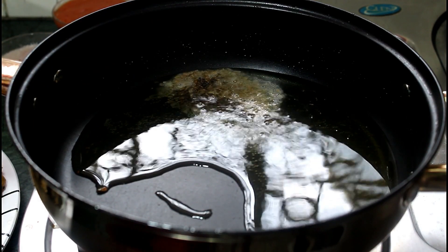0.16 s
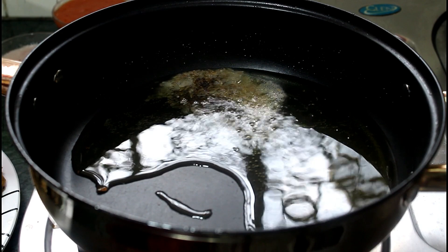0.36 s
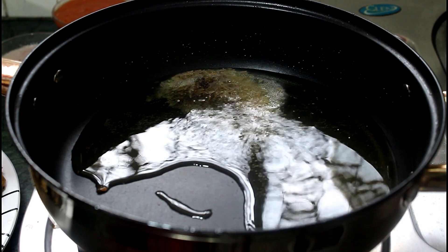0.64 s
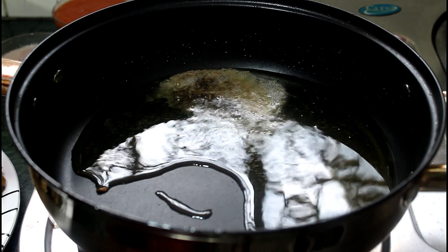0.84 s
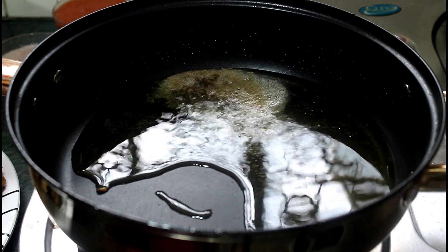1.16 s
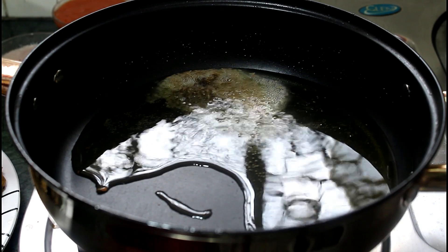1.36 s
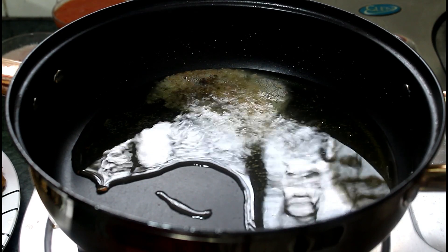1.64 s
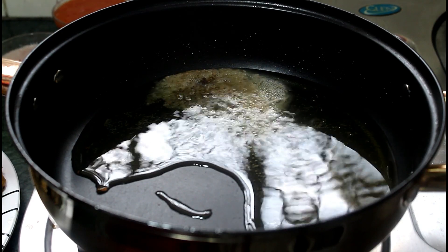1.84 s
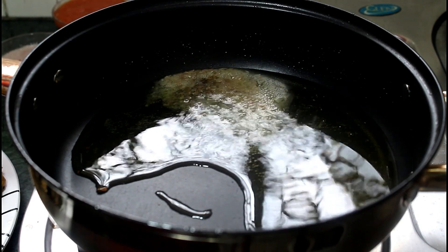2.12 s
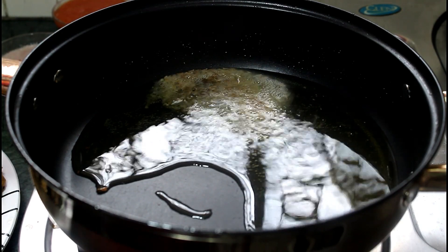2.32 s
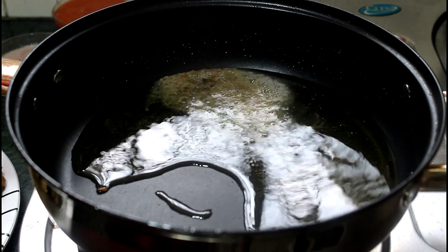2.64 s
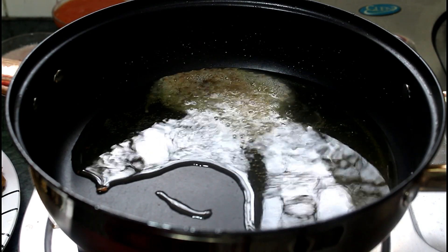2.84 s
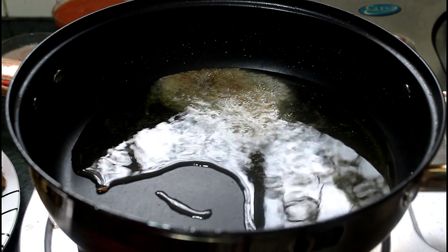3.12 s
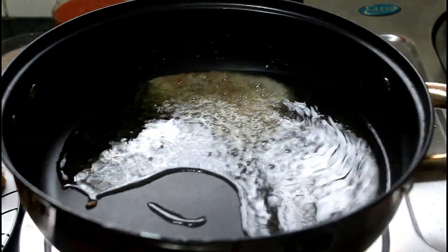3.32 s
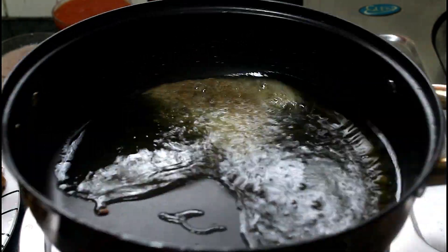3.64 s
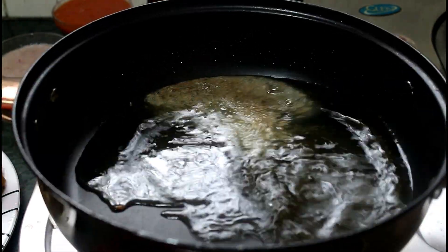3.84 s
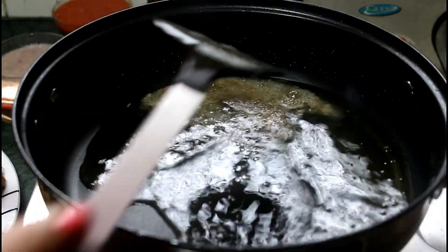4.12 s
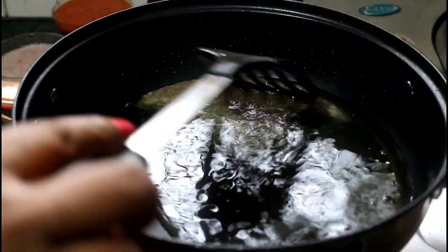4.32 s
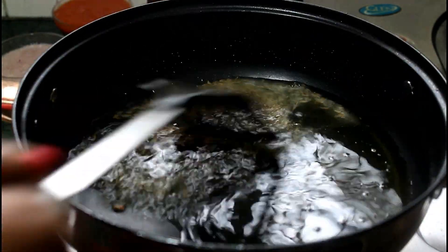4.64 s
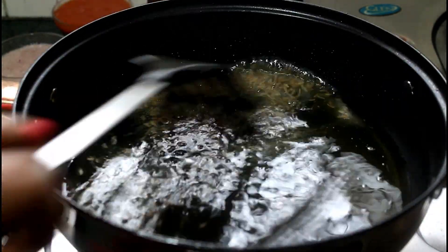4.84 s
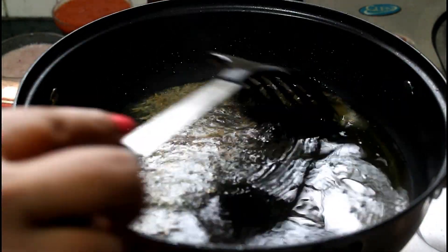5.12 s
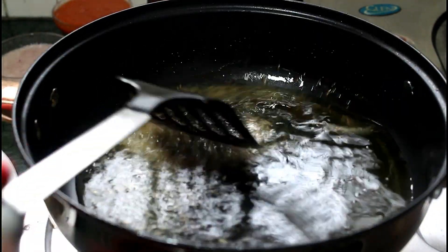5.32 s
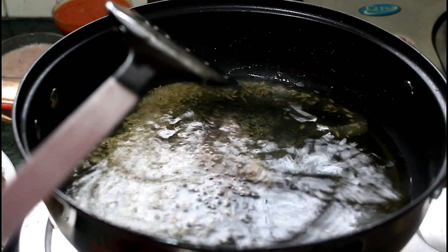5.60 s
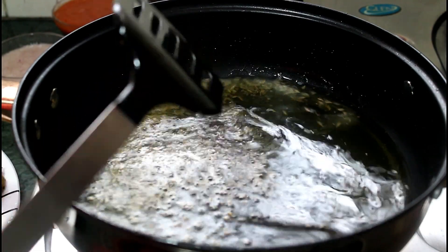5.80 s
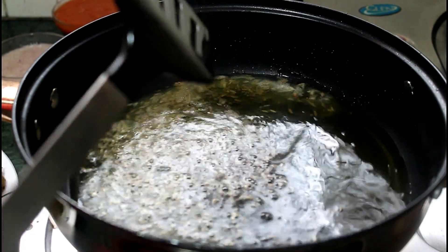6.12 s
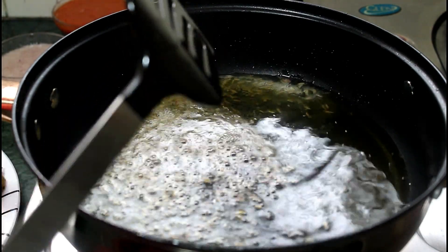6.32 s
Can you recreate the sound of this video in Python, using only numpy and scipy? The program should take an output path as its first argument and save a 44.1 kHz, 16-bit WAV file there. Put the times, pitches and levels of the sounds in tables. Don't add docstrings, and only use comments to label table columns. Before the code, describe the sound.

A fine fizz of frying seeds over a dull wash of traffic and gas flame, heard close by a small camera. A far high horn drones, stops, then returns louder. Hard dishes knock once and later clatter in a quick run with short kitchen echoes. Stirring then brings bursts of oil crackle, dry ticks and piercing pops with little sprays, ending on a hard snap.

```python
import sys
import numpy as np
from scipy import signal
from scipy.fft import rfft, irfft
from scipy.io import wavfile
from scipy.ndimage import uniform_filter1d

SR = 44100
rng = np.random.default_rng(int(sys.argv[2]) if len(sys.argv) > 2 else 0)


def invert_db(level):
    return 10 ** (np.asarray(level, dtype=float) / 20)


def store_pcm(level_fs):
    pcm = np.round(np.clip(level_fs, -1, 1) * 32767).astype(np.int16)
    wavfile.write(sys.argv[1], SR, np.atleast_2d(pcm).T)


N = 284886


def evened(x):
    return x / np.sqrt(np.mean(x ** 2) + 1e-20)


def read(points, hz):
    f, value = np.transpose(points)
    return np.interp(np.log(hz + 1), np.log(f + 1), value)


def add(mix, s, sound):
    part = mix[round(s * SR):][:len(sound)]
    part += sound[:len(part)]


def smooth_twice(x, size):
    return uniform_filter1d(uniform_filter1d(x, size=size), size=size)


def banded(x, from_hz, to_hz):
    band = [from_hz, min(to_hz, 20000)]
    return signal.sosfilt(signal.butter(4, band, "bandpass", fs=SR, output="sos"), x)


def resonate(x, hz, width):
    turn = np.exp(2j * np.pi * np.cumsum(hz * np.ones(len(x))) / SR)
    r = np.exp(-np.pi * width / SR)
    return 2 * (turn * signal.lfilter([1 - r], [1, -r], x / turn)).real


def summed(*levels_db):
    return 10 * np.log10(sum(invert_db(db) ** 2 for db in levels_db))


def swells(rows, rise, fall):
    t = np.arange(0, N / SR, .005)
    s, db, against_db = np.transpose(rows)
    before, after = np.maximum(s - t[:, None], 0), np.maximum(t[:, None] - s, 0)
    shape_db = db - rise * before - fall * after
    return t, shape_db.max(1), (shape_db + against_db).max(1)


def shaped(x, colour, edges_hz, rows, patchy_db, flicker_db):
    hz, t, z = signal.stft(x, SR, nperseg=512, noverlap=384)
    s, *levels_db = np.transpose(rows)
    gain = invert_db(read(colour, hz))
    bands = np.array([1 / (1 + (lo / (hz + 1)) ** 12) / (1 + (hz / hi) ** 12) for lo, hi in edges_hz])
    power = (bands * gain ** 2).sum(1) / len(hz)
    level = np.array([invert_db(np.interp(t, s, db)) ** 2 / p for db, p in zip(levels_db, power)])
    patches = uniform_filter1d(rng.standard_normal(z.shape), size=7, axis=0)
    patches = evened(uniform_filter1d(patches, size=24, axis=1))
    flicker = evened(uniform_filter1d(rng.standard_normal(len(t)), size=4))
    z = z * gain[:, None] * np.sqrt(bands.T @ level)
    z = z * invert_db(patchy_db * patches + flicker_db * flicker)
    return signal.istft(z, SR, nperseg=512, noverlap=384)[1][:N]


# (t/s, level/dB)
DUCK = [(0, -5), (.3, -1), (1.75, 0.5), (1.95, -0.5), (2.3, -5), (2.95, -1.5), (3.12, -13.5), (3.3, -10.5),
        (3.6, -11), (4.24, -30), (4.42, -12), (4.56, -12.5), (5.55, -10.5), (5.75, -21.5), (5.9, -12),
        (6.14, -25), (6.28, -19), (6.45, -19.5)]


def ducked(t, share):
    return share * np.interp(t, *np.transpose(DUCK))


def bubbles(per_s, spread_db, hiss):
    bursting = rng.random(N) < per_s / SR
    size = np.minimum(rng.exponential(1, N), 4)
    sign = rng.choice([-1., 1.], N)
    bursts = evened(sign * invert_db(spread_db * size) * bursting)
    return evened(bursts + hiss * rng.standard_normal(N))


# (t/s, level of the eighth partial/dB)
HORN_BLASTS = [
    [(0, -62), (.15, -58), (.2, -62), (.27, -53), (.35, -59), (.5, -62), (.75, -65), (1.0, -56),
     (1.08, -54), (1.2, -60), (1.37, -54), (1.45, -58), (1.55, -61), (1.62, -55), (1.7, -63), (1.92, -76)],
    [(2.92, -45), (3.0, -50), (3.07, -44), (3.12, -54), (3.16, -44), (3.27, -52), (3.54, -52), (4.2, -43),
     (4.25, -50), (4.29, -70), (4.37, -59), (5.05, -64), (5.2, -59), (5.56, -62), (5.72, -75), (5.82, -72),
     (5.9, -62)],
]
# (t/s, level/dB, top fizz against it/dB)
FIZZ_SURGES = [(.19, -45.5, -5), (.69, -49.5, -2.5), (1.16, -57, 2), (1.52, -56, 1.5), (1.79, -53.5, -3.5),
               (2.3, -51.5, -3), (2.53, -60, 7.5), (2.78, -51.5, -11), (2.87, -61, 10), (3.28, -46, -10.5),
               (3.4, -45, -9.5), (4.5, -54, -3)]
# (f/Hz, level per Hz/dB)
FIZZ_COLOUR = [(1180, -37.5), (2000, -9.5), (2960, 0), (3230, -1.5), (3370, 4.5), (4190, -8), (5250, -4.5),
               (7640, 4.5), (11100, -21.5), (16000, -42)]
# (t/s, crackle level/dB, lower crackle against it/dB)
STIR_PUSHES = [
    (4.7, -53.5, -29),
    (4.82, -46, -4),
    (5.045, -40, -11.5),
    (5.18, -44.5, -11),
    (5.24, -51.5, 6.5),
    (5.4, -38, -8),
    (5.515, -45, -3.5),
    (5.61, -44, -3),
]
# (f/Hz, level per Hz/dB)
STIR_COLOUR = [(1180, -57), (2000, -19), (3370, -4), (3740, -4), (6590, 9.5), (8480, 4.5), (9920, -12.5),
               (13300, -23), (16000, -63)]


def fizz():
    t, surge_db, top_db = swells(FIZZ_SURGES, rise=54, fall=43)
    haze_db = [np.interp(t, *np.transpose(rows), left=-99, right=-99) - 1 for rows in HORN_BLASTS]
    main_db = summed(-59.5, surge_db) + ducked(t, share=0.85)
    low_db = summed(-73.5, *haze_db) + ducked(t, share=0.7)
    high_db = summed(-67.5, top_db) + ducked(t, share=0.1)
    simmer = np.transpose([t, main_db, low_db, high_db])
    fine = shaped(bubbles(per_s=13000, spread_db=-8.5, hiss=0.89), FIZZ_COLOUR,
                  [(4500, 6190), (2230, 3970), (8880, 20000)], simmer, patchy_db=2.2, flicker_db=0.3)
    stir = np.transpose(swells(STIR_PUSHES, rise=165, fall=208))
    coarse = shaped(bubbles(per_s=3500, spread_db=4.5, hiss=1.17), STIR_COLOUR,
                    [(4540, 16000), (2030, 4640)], stir, patchy_db=2.2, flicker_db=2.0)
    return fine + coarse


# (t/s, peak
# level/dB, f/Hz, spray level/dB, spray time/s)
POPS = [(2.914, -15, 2530, -4, 0.03), (2.5561, -10.5, 2650, -16, 0.099), (4.795, -40, 4600, 6, 0.083),
        (4.834, -38.5, 6760, -8, 0.52), (5.1607, -30, 5800, -20.5, .09), (5.178, -27, 5350, -22, .1),
        (5.2007, -24, 7170, -20, 0.11), (5.2301, -17.5, 7900, -22.5, 0.28),
        (5.2776, -18.5, 6460, -20.5, 0.17), (5.3582, -22.5, 7050, -16, 0.38),
        (5.375, -38.5, 5100, -2, 0.79), (5.4877, -30, 3720, -20, .12), (5.586, -10, 7880, -10, 0.025),
        (5.6475, -24, 7650, -21, 0.28), (5.9284, -7, 7400, -15.5, 0.071), (5.962, -19, 5140, -26, 0.08),
        (5.985, -20.5, 6670, -13.5, 0.15), (5.9872, -18, 4350, -10.5, 0.029), (6.316, -23, 5990, -13, 0.13),
        (6.396, -32.5, 6950, -10, 0.43), (6.4401, -15, 5400, -3, 0.057), (4.6743, -36.5, 7770, -13.5, .08),
        (4.693, -37.5, 7300, -7, 0.046), (4.8058, -33, 6100, -5, 0.046), (4.982, -46.5, 7700, -6, .05),
        (4.995, -30, 7100, -24.5, .05), (5.025, -25.5, 5500, -13, 0.044), (5.042, -27.5, 6260, -2.5, 0.17),
        (5.09, -23, 5540, -12, .05), (5.3586, -27, 5040, -15, .05), (5.3722, -24, 7360, -23, .05),
        (5.38, -35.5, 3760, -3.5, 0.057), (5.3971, -33, 6370, -16, .06), (5.4075, -19.5, 5270, -10, .05),
        (5.418, -25, 4500, -9, 0.043), (5.507, -26, 5330, -27, .12), (5.586, -16, 5530, -8, 0.023),
        (5.23, -27, 4400, -23, .04)]


def pops(shell_width_hz=430, tick_db=-20, tick_s=0.0025):
    t, out = np.arange(6000) / SR, np.zeros(N)
    for s, db, hz, spray_db, t60 in POPS:
        spray = rng.standard_normal(len(t))
        turn = 2 * np.pi * hz * t
        ring = np.sin(turn) + .5 * np.sin(1.9 * turn) + 0.17 * np.sin(1.035 * turn)
        crack = ring * t * np.exp(-2 * np.pi * shell_width_hz * t)
        mist = 2 * spray * invert_db(spray_db - 60 * t / t60) * (1 - np.exp(-t / 0.00043))
        snap = banded(spray * np.exp(-t / tick_s), 1.45 * hz, min(1.73 * hz, 13500))
        add(out, s, invert_db(db + tick_db) * snap)
        add(out, s, invert_db(db) * banded(crack / abs(crack).max() + mist, 0.7 * hz, 1.234 * hz))
    return out


# (band from f/Hz, band to f/Hz, treble level/dB, blows (t/s, peak level/dB, ring time/s))
KNOCKS = [(634, 980, -60, [(.802, -43, 0.37)]), (900, 2070, -54, [(.799, -24, 0.63), (.812, -22.5, 0.48),
          (.806, -16.5, 0.41), (.822, -18.5, 0.18)]), (2230, 3300, -56, [(.799, -26.5, 0.48)]),
          (950, 2050, -36, [(4.895, -34.5, 0.29)]), (1910, 2900, -27, [(2.557, -29.5, 0.48),
          (2.913, -23, 0.039)]), (1720, 3300, -5, [(2.882, -24, 0.29)]),
          (747, 1950, -17, [(2.913, -18, .27), (3.619, -11.5, 0.36), (3.95, -19, 0.19), (4.04, -13, 0.29)]),
          (810, 2170, -16.5, [(4.008, -10, 0.13), (4.014, -7.5, 0.15)]),
          (710, 1670, -11, [(3.5465, -15, 0.041), (3.549, -11, 0.15), (3.729, -9, .08),
          (3.736, -10.5, 0.12), (3.872, -9.5, 0.035), (3.878, -8.5, 0.05), (3.882, -7.5, 0.095)]),
          (1400, 2000, -15.5, [(3.7227, -7, 0.082)]), (1180, 3900, -3, [(3.897, -11, .05),
          (4.052, -22, 0.11)])]
# (f/Hz, width/Hz, level/dB)
DISHES = [(465, 45, 15), (2020, 130, 2.5), (830, 120, -11.5), (1240, 40, -18), (1420, 210, -16),
          (1890, 76, -19.5), (2460, 31, -17), (3320, 34, -4.5), (3820, 41, -17.5), (4350, 40, -13),
          (4555, 75, -14.5), (5050, 67, -15), (5990, 180, 0), (7600, 69, -17)]
# (f/Hz, level/dB)
DISH_TREBLE = [(200, 3.5), (3000, 6.5), (4300, 1), (6000, 2.5), (8400, -7), (10500, -29), (13000, -39),
               (16000, -66)]


def knocks(rise_s=0.00034, modes_db=-12.0, thud_db=-17.5, chatter_db=2.0, unlike_db=3.0, body_db=-1.5):
    t, out = np.arange(13500) / SR, np.zeros(N)
    hz = np.fft.rfftfreq(len(t), 1 / SR)
    for from_hz, to_hz, treble_db, blows in KNOCKS:
        for s, db, t60 in blows:
            chatter = evened(uniform_filter1d(rng.standard_normal(len(t)), size=90))
            struck = rng.standard_normal(len(t)) * invert_db(chatter_db * chatter)
            peaks = 0
            for f, width, note_db in DISHES:
                unlike = unlike_db * np.clip(rng.standard_normal(), -2, 1)
                peaks = peaks + invert_db(note_db + 5.5 + unlike) / (1 + 2j * (hz - f) / width)
            modes = irfft(rfft(struck) * (1 + invert_db(modes_db) * peaks), len(t))
            treble = irfft(rfft(modes) * invert_db(treble_db + read(DISH_TREBLE, hz)), len(t))
            fade = invert_db(db - 60 * t / t60) * (1 - np.exp(-t / rise_s)) ** 2
            blow = fade / np.std(banded(modes, from_hz, to_hz)) / 3
            body = invert_db(body_db) * banded(blow * modes, from_hz, to_hz)
            thud = invert_db(thud_db + .5 * treble_db) * banded(blow * modes, 200, from_hz)
            add(out, s, body + banded(blow * treble, to_hz, 21000) + thud)
    return out


# (t/s, ring time/s,
# notes (f/Hz, level/dB))
RINGS = [(.8, 0.2, [(1136, -45), (1335, -30), (1577, -23), (1750, -31), (1868, -43), (2089, -42),
         (2412, -44), (3020, -54)]), (.822, 0.11, [(1577, -19.5), (1050, -37), (1780, -22), (2030, -39),
         (2375, -29.5)]), (2.5565, 0.077, [(1981, -45), (2363, -30), (2649, -34), (2805, -28), (2988, -29),
         (3180, -49)]), (2.885, 0.25, [(2519, -25), (3542, -37)]), (2.884, 0.055, [(5674, -24), (6368, -26),
         (7876, -41)]), (2.9143, 0.12, [(760, -38), (851, -34.5), (1222, -29), (1567, -22.5), (1680, -25.5),
         (2514, -44), (3080, -25.5)]), (4.794, 0.039, [(3750, -32), (4050, -29.5)]),
         (4.896, 0.13, [(1200, -33), (1362, -34.5), (1502, -44)]), (5.96, 0.025, [(3600, -14),
         (4000, -14.5)]), (6.3155, 0.016, [(4400, -22.5), (8500, -31)]), (5.984, 0.03, [(4100, -24),
         (6500, -28)])]
# (t/s, ring time/s, notes (f/Hz, level/dB))
CLATTER = [(3.549, .08, [(738, -26.5), (937, -21.5), (1405, -24), (1669, -25), (2191, -16), (3461, -26.5),
           (5728, -33.5)]), (3.572, .15, [(829, -23)]), (3.62, .17, [(894, -24.5), (1071, -32),
           (1227, -32.5), (1410, -29), (1550, -26), (2013, -30.5)]), (3.624, .09, [(6060, -23),
           (6250, -31)]), (3.724, .12, [(915, -24), (1357, -27), (1701, -22.5), (1879, -22), (2050, -14.5),
           (3257, -26.5)]), (3.737, .14, [(830, -23), (2066, -19), (6050, -20.5), (1710, -25)]),
           (3.876, .09, [(1034, -20.5), (1362, -20), (1701, -21), (2024, -13), (5712, -22), (5992, -15.5)]),
           (3.897, .09, [(1733, -28.5), (2256, -21.5), (3214, -32.5), (3553, -32.5), (6019, -29.5)]),
           (3.95, .15, [(921, -34), (1464, -33), (1943, -44), (2546, -38), (3500, -34)]),
           (4.008, .13, [(1120, -22.5), (1260, -25.5), (1567, -17), (1825, -25), (1997, -36), (2713, -36),
           (3262, -24.5)]), (4.045, 0.22, [(759, -28), (1034, -43), (1685, -52), (2126, -46), (2546, -46),
           (3040, -27)])]


def rings(rise_s=0.002, split=.021, split_db=-5, stifle=3):
    t, out = np.arange(12000) / SR, np.zeros(N)
    for table, twin in ((RINGS, 0), (CLATTER, invert_db(split_db))):
        for s, t60, modes in table:
            notes = np.zeros(len(t))
            for k, (hz, db) in enumerate(modes):
                turn = 2 * np.pi * hz * t
                pair = np.sin(turn) + twin * np.sin((1 - split) * turn)
                notes += (-1) ** k * invert_db(db) * pair
            u = t / t60
            fade = invert_db(-60 * u * (1.5 + stifle * twin * u))
            add(out, s, notes * fade * (1 - np.exp(-t / rise_s)))
    return out


# (t/s,
# length/s, start f/Hz, end f/Hz, level/dB)
SQUEAKS = [(.14, 0.099, 200, 190, -62.5), (0.314, 0.1, 1660, 1630, -54), (0.481, 0.093, 1590, 1700, -56),
           (0.634, 0.09, 2030, 2110, -51), (.7, .08, 2120, 2130, -51), (.638, 0.13, 4120, 4280, -50),
           (0.639, 0.06, 6130, 6330, -46), (0.672, 0.1, 6360, 6450, -39), (0.688, 0.05, 4560, 4480, -40),
           (1.055, .045, 6250, 6390, -50), (1.08, 0.075, 6390, 6420, -43), (1.14, .08, 6380, 6350, -57),
           (1.2, .22, 3010, 3010, -57), (1.5, .14, 3015, 3005, -61), (1.138, 0.12, 1690, 1600, -60),
           (1.05, 0.3, 3180, 3120, -60), (5.06, 0.1, 6400, 6400, -49), (5.45, 0.11, 6410, 6400, -49),
           (5.73, 0.036, 940, 920, -67), (5.74, 0.24, 1565, 1590, -68), (6.272, 0.08, 910, 880, -62),
           (6.284, 0.078, 1626, 1560, -60), (6.2, 0.19, 1170, 1170, -73), (6.198, .05, 1780, 1770, -70),
           (5.998, .05, 900, 880, -74)]
# (t/s, length/s, f/Hz, width/Hz, level/dB)
SCRAPES = [(0.16, 0.092, 1365, 275, -52), (0.416, 0.12, 1250, 201, -57), (0.944, 0.125, 1667, 60, -46.5),
           (2.144, 0.14, 1180, 139, -47), (2.461, 0.13, 1400, 840, -55), (4.764, 0.18, 1095, 280, -55),
           (5.229, 0.093, 1440, 1400, -57), (5.526, 0.067, 1560, 1210, -55), (5.78, 0.14, 1480, 450, -66.5),
           (5.839, 0.075, 1610, 500, -63.5), (5.884, 0.045, 1740, 500, -56.5),
           (6.295, 0.042, 1340, 500, -53.5), (6.197, 0.25, 1400, 900, -63.5),
           (6.407, 0.048, 2960, 800, -52), (5.716, 0.099, 1330, 452, -65.5)]
# (t/s, length/s, f/Hz, width/Hz, level/dB)
PUFFS = [(5.484, 0.06, 3390, 200, -46.5), (2.883, 0.02, 8020, 1000, -32), (2.557, 0.0096, 10400, 1500, -56),
         (4.749, 0.01, 8170, 600, -49), (6.44, 0.0196, 2850, 600, -32), (0.222, 0.029, 7100, 1300, -40.5),
         (0.228, 0.036, 5440, 800, -46.5), (0.531, 0.14, 5140, 514, -51.5), (1.085, 0.012, 6380, 216, -41),
         (1.683, 0.17, 5120, 553, -52.5), (2.554, 0.014, 5950, 546, -36), (2.762, 0.075, 6300, 170, -51.5),
         (2.776, 0.052, 5100, 540, -52), (5.028, 0.077, 4170, 430, -50), (5.237, 0.013, 3740, 280, -43.5),
         (5.926, .023, 3500, 1130, -42.5), (6.308, .26, 8400, 1100, -63), (6.4402, 0.0072, 8040, 1400, -23),
         (5.928, .03, 2300, 900, -42), (5.929, .012, 9300, 1500, -34), (5.238, .03, 3800, 500, -46),
         (3.547, .025, 13500, 2500, -53), (3.6195, .006, 3500, 1500, -33),
         (.72, .13, 4250, 400, -56), (.68, .05, 6400, 300, -44), (.78, .06, 6300, 250, -55),
         (1.09, .1, 5200, 450, -56), (1.69, .12, 4700, 250, -58), (3.34, .08, 5100, 300, -57),
         (3.36, .07, 4500, 200, -59), (5.2305, .005, 11000, 2500, -46), (5.2775, .005, 10500, 2500, -49),
         (5.932, .2, 12000, 3000, -65), (5.99, .16, 7600, 1300, -57), (5.99, .16, 4000, 800, -60),
         (2.6, .25, 1130, 400, -63), (3.8975, .004, 4000, 1700, -22), (1.1, .3, 3050, 350, -61),
         (.3, .3, 1500, 500, -60), (3.951, .005, 3000, 1400, -31)]


def rubs(clean_below_hz=90):
    out = np.zeros(N)
    rows = [(s, length, a, b, 45 + .003 * a, db) for s, length, a, b, db in SQUEAKS]
    rows += [(s, length, hz, hz, width, db) for s, length, hz, width, db in SCRAPES + PUFFS]
    for s, length, start_hz, end_hz, width, db in rows:
        slip = rng.standard_normal(round(1.3 * length * SR))
        u = np.linspace(0, 1, len(slip))
        hz = start_hz + (end_hz - start_hz) * u
        swell = np.clip(u / 0.038, 0, 1) * np.clip((1 - u) / .5, 0, 1) ** 3.0
        clean = np.clip(1 - width / clean_below_hz, 0, 1)
        tone = np.sqrt(2) * np.sin(2 * np.pi * np.cumsum(hz) / SR)
        rough = evened(resonate(resonate(slip, hz, width), hz, width))
        add(out, s, invert_db(db) * evened(clean * tone + (1 - clean) * rough) * swell)
    return out


# (multiple of its base pitch, level/dB)
HORN_PARTIALS = [
    (1, -18),
    (6, -19),
    (7, -10),
    (8, 0),
]
HORN_HZ, HORN_SAG_HZ, HORN_SAG_S = [3450, 3408], [5, 26], .5


def horn(waver_db=3.3):
    out = np.zeros(N)
    for rows, hz, sag_hz in zip(HORN_BLASTS, HORN_HZ, HORN_SAG_HZ):
        s, db = np.transpose(rows)
        t = np.arange(s[0], s[-1], 1 / SR)
        sag = sag_hz * (1 - np.exp(-(t - s[0]) / HORN_SAG_S))
        turns = np.cumsum(hz - sag) / SR / 8
        level_db = np.interp(t, s, db) + ducked(t, share=.7)
        ends = np.clip(np.minimum(t - s[0], s[-1] - t) / 0.0071, 0, 1)
        for k, partial_db in HORN_PARTIALS:
            waver = np.clip(evened(smooth_twice(rng.standard_normal(len(t)), 450)), -2, 1.5)
            tone = np.sqrt(2) * np.sin(2 * np.pi * round(k) * turns)
            add(out, s[0], tone * invert_db(level_db + partial_db + waver_db * waver) * ends)
    return out


# (t/s, level/dB, rumble against it/dB)
AIR_SWELLS = [(.25, -56, -25), (.78, -54, -15), (2.2, -53, -17.5), (2.56, -56, -17), (2.87, -69, -25),
              (3.1, -43.5, -18.5), (3.41, -45.5, -14.5), (4.3, -63.5, 2), (4.55, -70, 3.5),
              (4.94, -48, -19.5), (5.33, -54.5, -10.5), (5.8, -51, -23), (6.02, -55.5, -35.5),
              (6.38, -41, -22)]
# (f/Hz, level per Hz/dB)
AIR_COLOUR = [(15, -51), (25, -25), (107, -13), (171, -2), (248, -5.5), (444, -4.5), (735, -7.5),
              (1110, -2.5), (1570, -6), (2600, -9.5), (3380, -36.5), (5720, -120)]


def air():
    t, murmur_db, rumble_db = swells(AIR_SWELLS, rise=58, fall=70)
    murmur_db = summed(-60, murmur_db) + ducked(t, share=1)
    rumble_db = summed(-68.5, rumble_db) + ducked(t, share=0.32)
    return shaped(rng.standard_normal(N), AIR_COLOUR, [(700, 2350), (20, 676)],
                  np.transpose([t, murmur_db, rumble_db]), patchy_db=1.5, flicker_db=0.8)


# (f/Hz, time/s)
KITCHEN = [(300, 0.39), (1200, 0.29), (4000, 0.26), (12000, 0.22)]


def kitchen(x):
    taps = np.zeros(SR // 2)
    at = np.arange(200, SR // 2 - 20, 16)
    taps[at + rng.integers(0, 16, len(at))] = rng.choice([-1., 1.], len(at))
    hz, t, z = signal.stft(taps, SR, nperseg=256)
    tail = signal.istft(z * invert_db(-60 * t / read(KITCHEN, hz)[:, None]), SR, nperseg=256)[1]
    return signal.fftconvolve(x, tail / np.linalg.norm(tail))[:N]


def microphone_hiss():
    return invert_db(-83.5) * evened(banded(rng.standard_normal(N), 10500, 15300))


def scene():
    struck, burst, rubbed = knocks() + rings(), pops(), rubs()
    echo = kitchen(invert_db(-9.5) * struck + invert_db(-9.5) * burst + invert_db(-7.5) * rubbed)
    both = fizz() + burst + struck + rubbed + echo + horn() + air() + microphone_hiss()
    differs = invert_db(-54.0) * kitchen(both)
    return np.array([np.roll(both, shift=1) + differs, both - differs])


def roll_off(x):
    return signal.sosfilt(signal.butter(12, 17120, fs=SR, output="sos"), x)


# (t/s, left jump, right jump)
SNAPS = [
    (3.72575, -1.2, -1.2),
    (5.92877, 1.25, 0),
    (6.44047, .85, 0),
]


def record(dry):
    out, step = dry.copy(), np.arange(-12, 12) + .5
    peak = -.45 * np.cos(2 * np.pi * step / 9) * np.hanning(24)
    wrapped = abs(step) < 1
    for s, left, right in SNAPS:
        add(out[0], s - 12 / SR, left * (peak + wrapped))
        add(out[1], s - 12 / SR, left * peak + right * wrapped)
    edge = signal.firwin(255, 16400, window=("kaiser", 9), fs=SR)
    out = signal.oaconvolve(np.clip(out, -.74, .74), edge[None], "same")
    return roll_off(out)


dry = scene()
out = record(dry)
store_pcm(out)
```